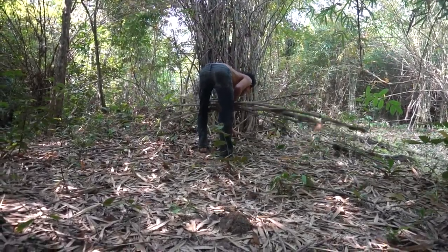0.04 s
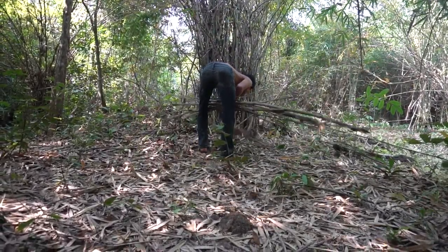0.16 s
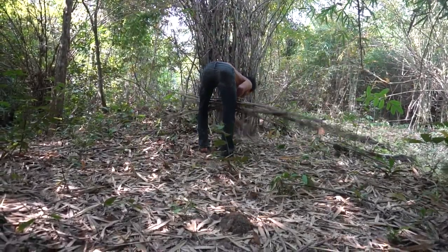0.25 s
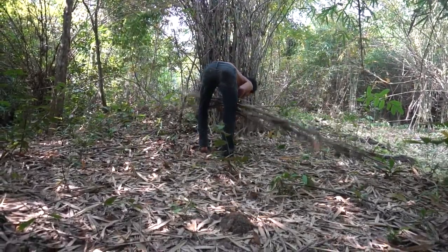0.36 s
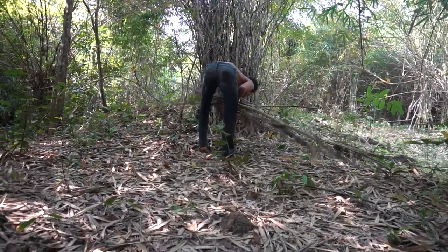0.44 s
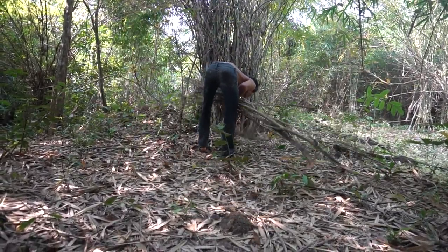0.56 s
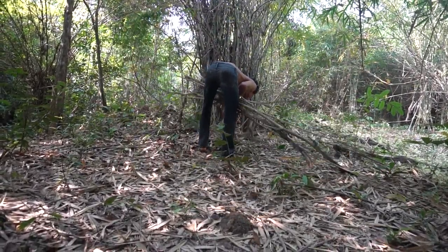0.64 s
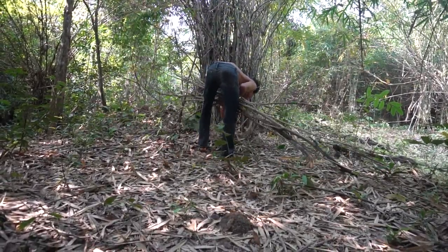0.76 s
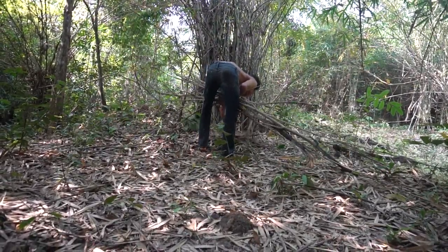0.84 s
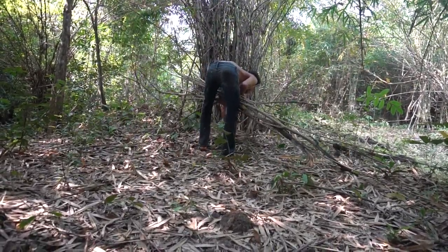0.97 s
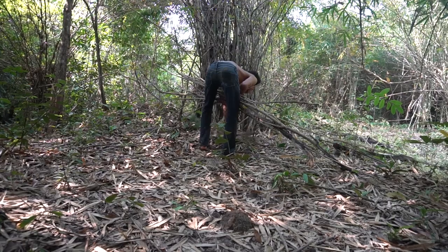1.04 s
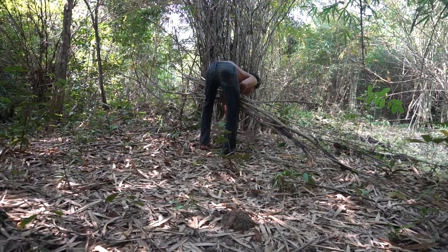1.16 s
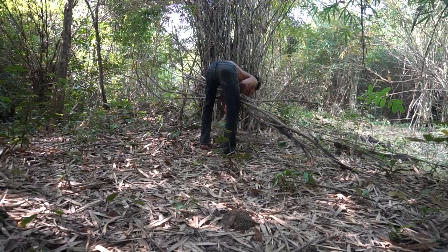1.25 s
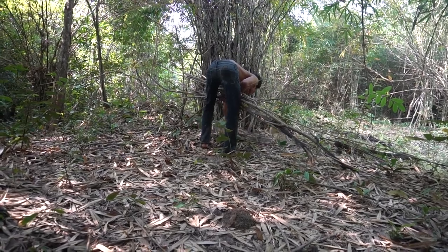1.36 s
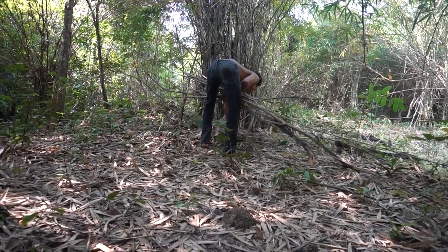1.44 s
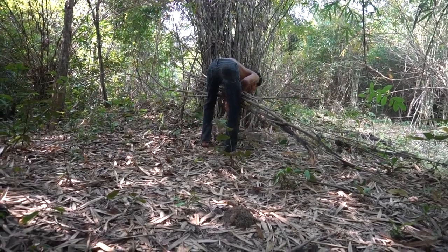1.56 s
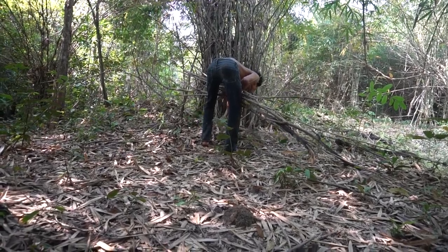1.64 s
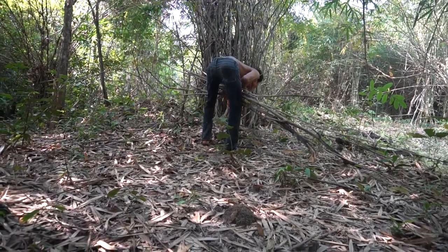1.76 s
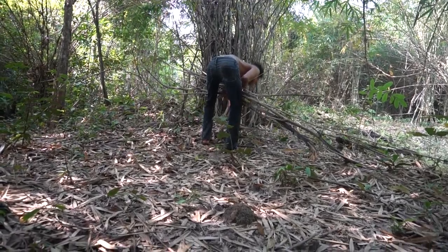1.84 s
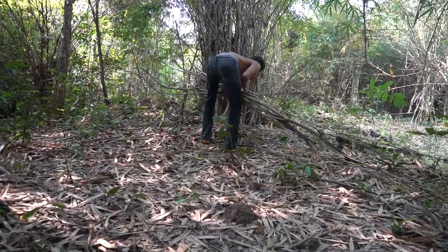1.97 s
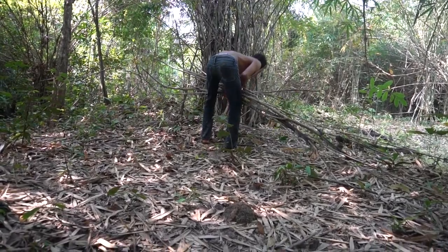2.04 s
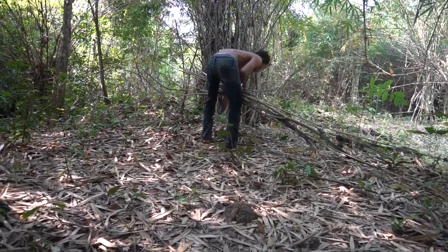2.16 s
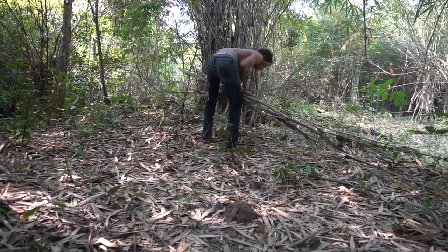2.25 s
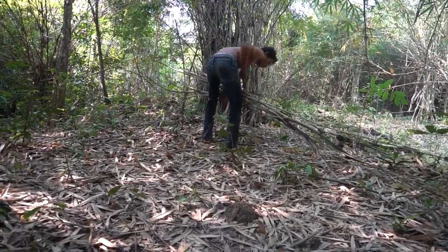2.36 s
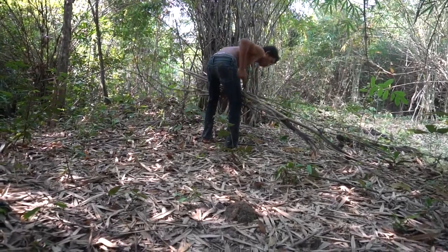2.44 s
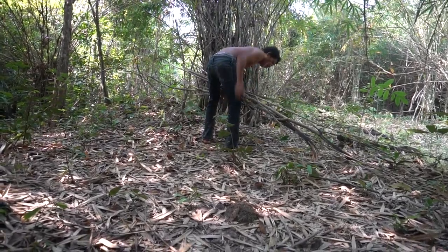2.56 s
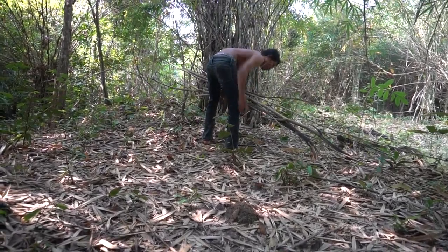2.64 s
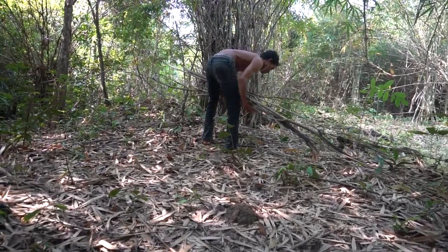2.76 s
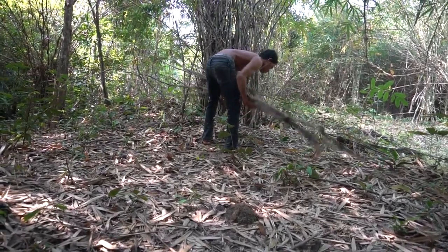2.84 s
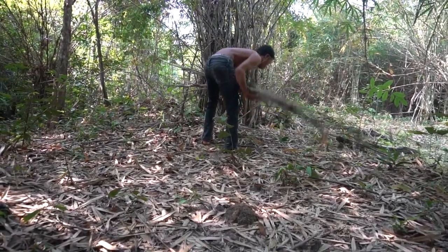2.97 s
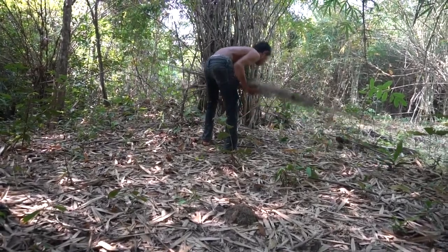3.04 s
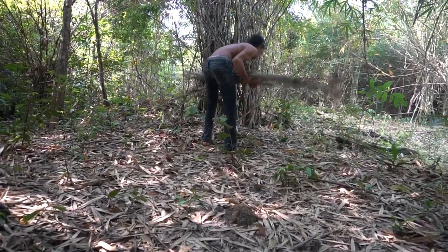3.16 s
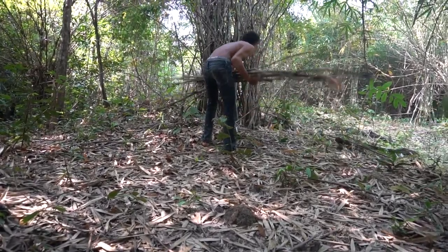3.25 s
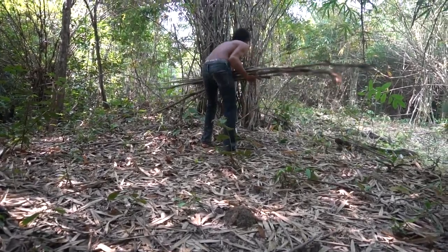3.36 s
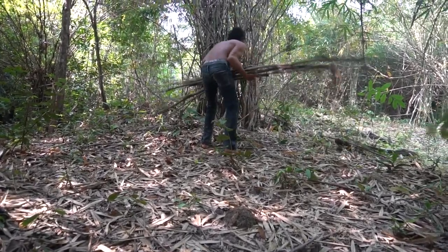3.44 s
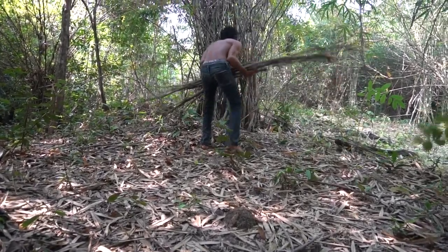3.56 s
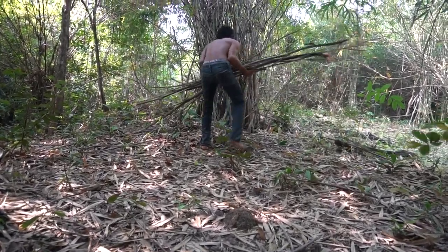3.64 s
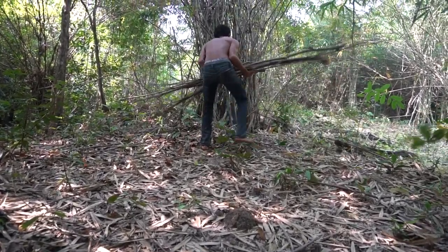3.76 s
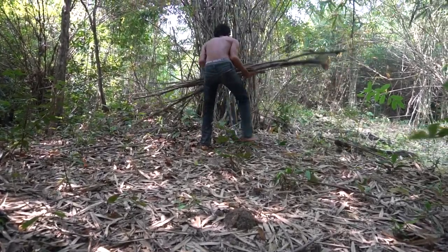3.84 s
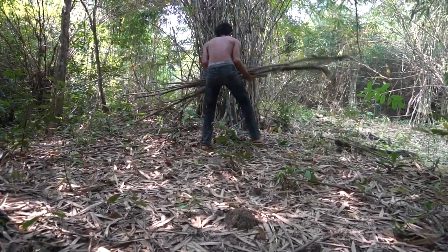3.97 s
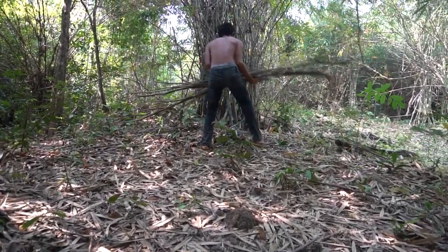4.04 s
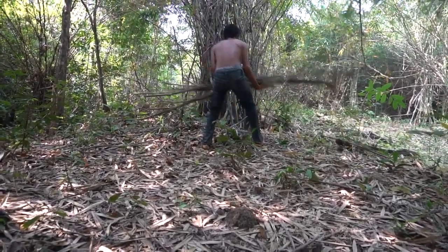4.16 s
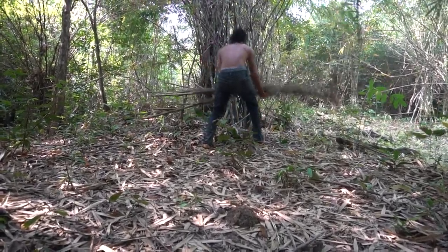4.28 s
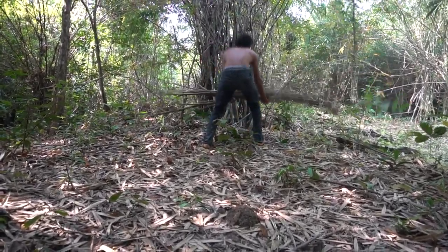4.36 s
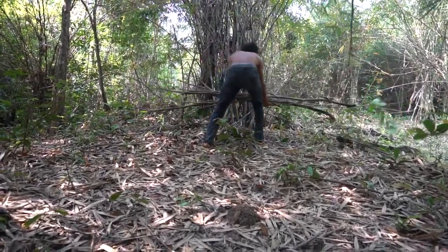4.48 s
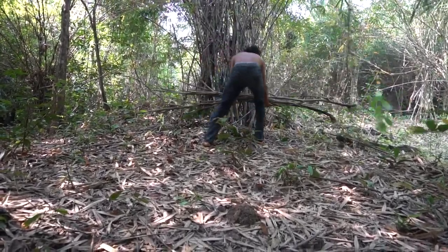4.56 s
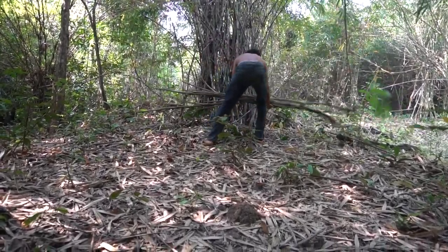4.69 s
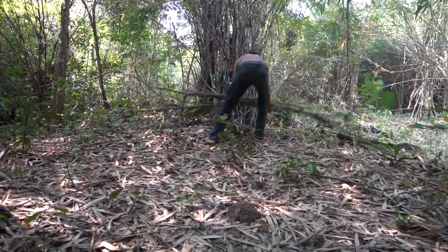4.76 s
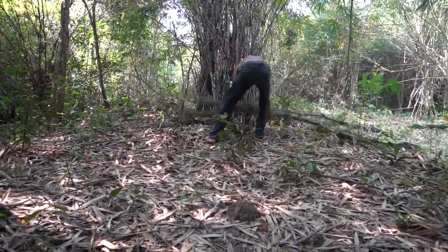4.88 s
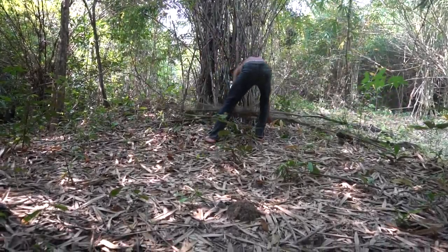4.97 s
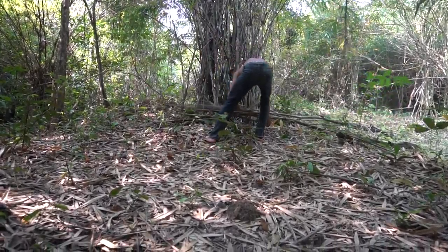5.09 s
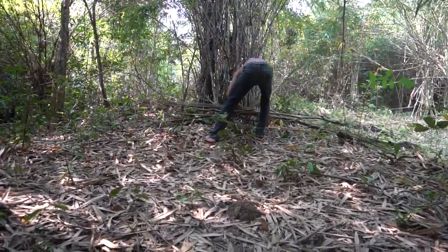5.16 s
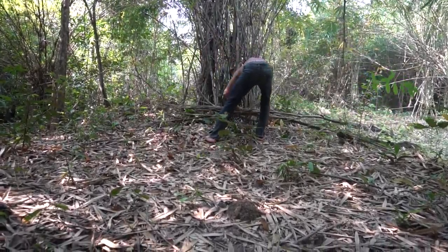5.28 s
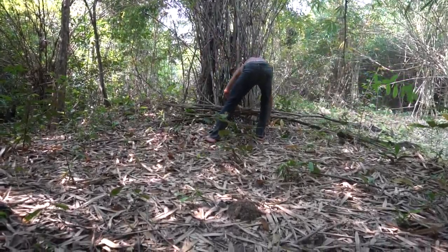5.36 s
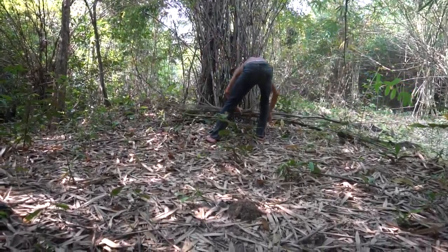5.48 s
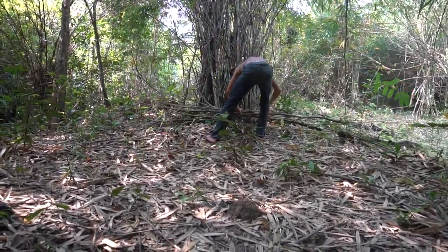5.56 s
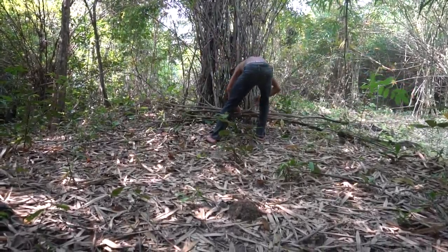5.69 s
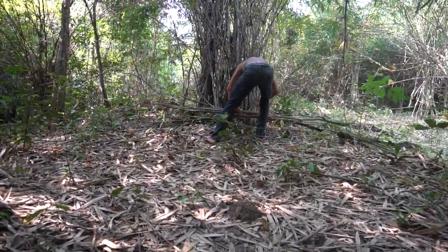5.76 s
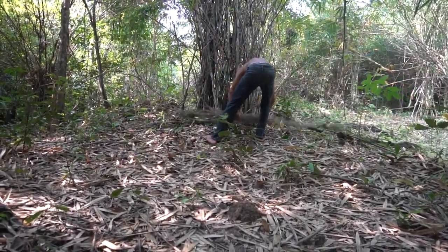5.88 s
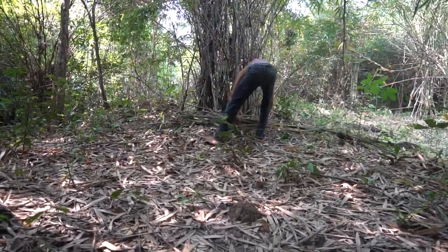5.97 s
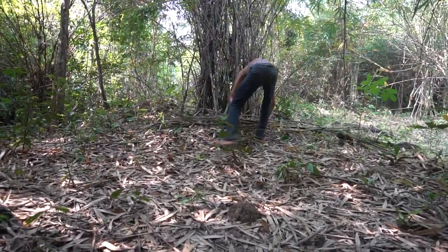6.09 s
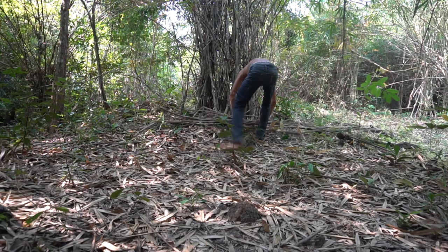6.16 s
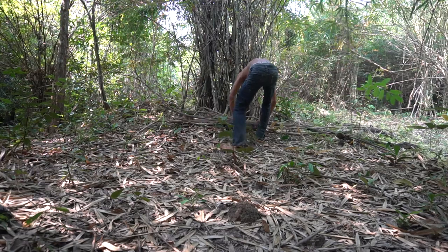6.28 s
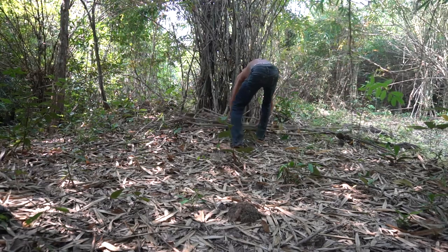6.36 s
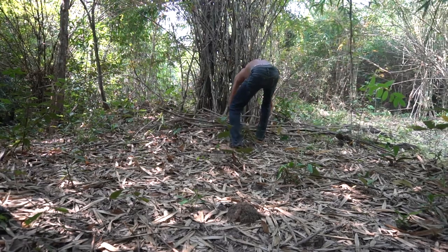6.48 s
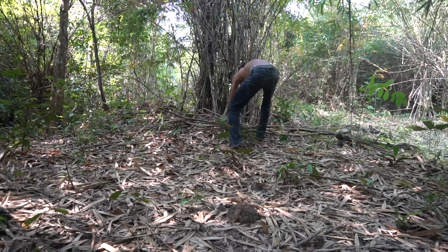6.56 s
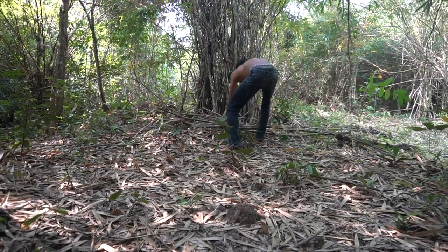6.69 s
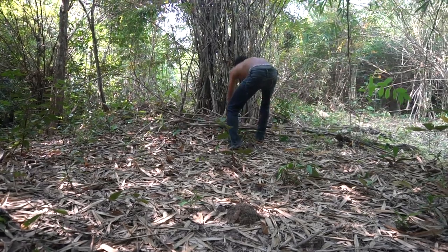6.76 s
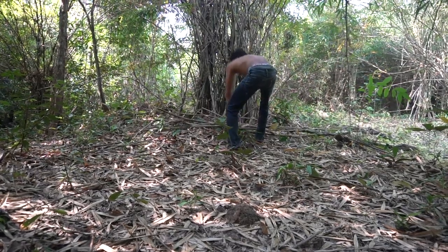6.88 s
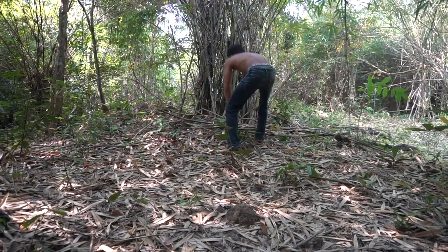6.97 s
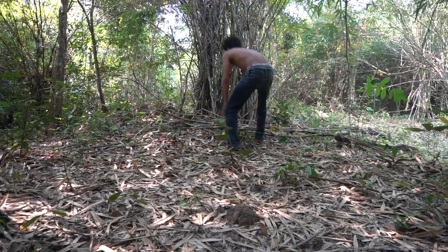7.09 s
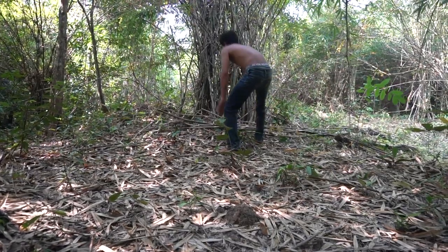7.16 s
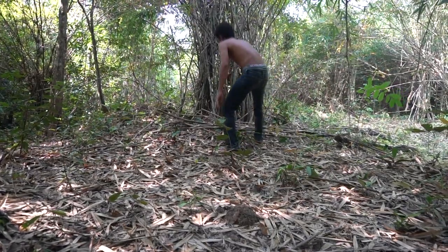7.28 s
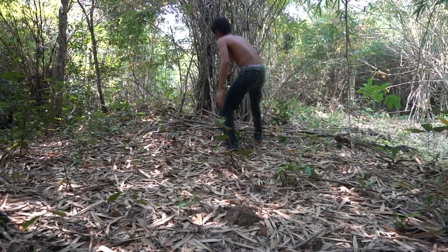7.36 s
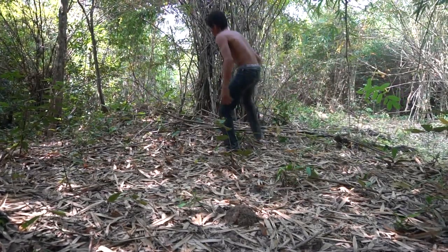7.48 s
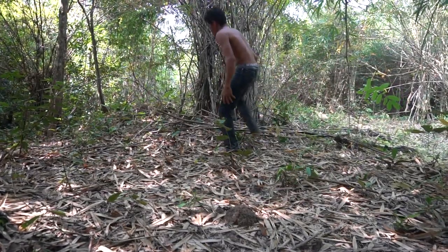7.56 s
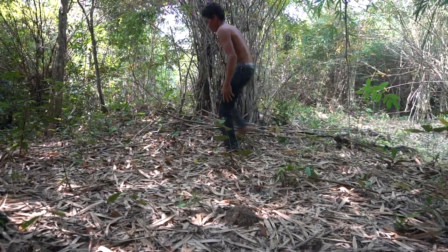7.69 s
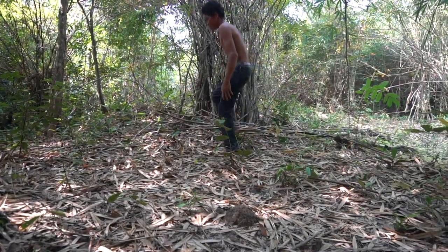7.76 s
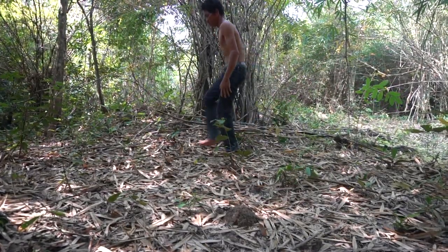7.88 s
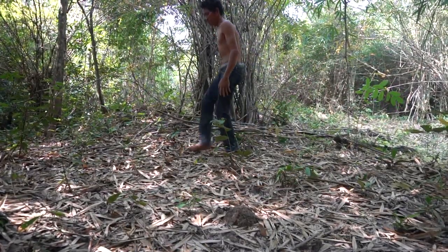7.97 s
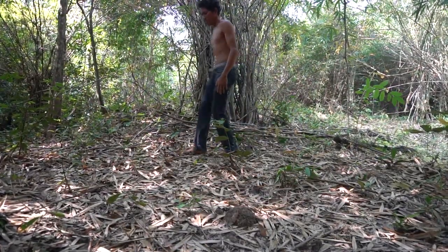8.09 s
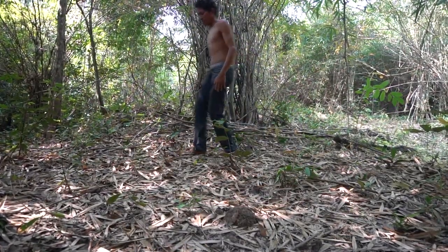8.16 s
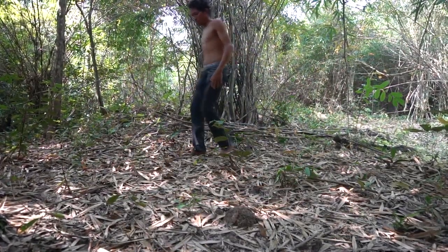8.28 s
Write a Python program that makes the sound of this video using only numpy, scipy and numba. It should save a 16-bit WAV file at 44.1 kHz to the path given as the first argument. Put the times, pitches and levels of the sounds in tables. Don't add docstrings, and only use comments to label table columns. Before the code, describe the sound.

In a quiet wood, a bundle of dry bamboo is dragged over dead leaves: dense crackle and snapping ribs, then a lull of faint rustles. It is lifted and swung with hollow knocks and loud cracks, laid down with crunches, and settles. Stereo microphone some metres away; faint engine drone, a bird whistling twice near the end.

```python
import sys
import numpy as np
from scipy import signal
from scipy.fft import rfft, irfft, next_fast_len
from scipy.io import wavfile
from scipy.ndimage import uniform_filter1d
from numba import njit

SR = 44100
rng = np.random.default_rng(int(sys.argv[2]) if len(sys.argv) > 2 else 0)


def volts_from_db(level):
    exponent = np.asarray(level, float) / 20
    return 10 ** exponent


def inscribe(sig):
    pcm = np.round(np.clip(np.atleast_2d(sig).T, -1, 1) * 32767)
    wavfile.write(sys.argv[1], SR, pcm.astype(np.int16))


N = 367353

# [f/Hz, density/dB]
WOOD_AIR = [(18, -40), (30, -2.5), (131, 4), (311, -8.5), (499, -8), (1010, -15.5), (2830, -21.5),
            (3220, -17.5), (9220, -31), (14800, -43), (16000, -35)]
# [f/Hz, level/dB]
AIR_APART = [(60, -20), (500, 0.5), (2000, 3.0), (6000, -6)]
# [t/s, f/Hz, level/dB]
ENGINE = [
    (0.0, 138.7, -72),
    (0.76, 140.5, -52),
    (2.71, 141, -65.5),
    (4.06, 137.7, -55.5),
    (4.17, 139.9, -63),
    (6.94, 139.7, -49.5),
    (7.52, 138.3, -64),
    (8.33, 139.3, -44.5),
]
# [t/s, f/Hz, level/dB]
ENGINE_UNDERTONE = [
    (.4, 93, -75),
    (.8, 92.8, -64),
    (1.6, 92.8, -65.5),
    (2.6, 92, -66),
    (3.0, 92, -85),
]
# [t/s, f/Hz, level/dB]
DOVE_COO = [
    (8.17, 387, -80),
    (8.21, 384, -60),
    (8.26, 360, -59),
    (8.34, 352, -67),
]
# [t from its drop/s, f/Hz, level/dB]
WHISTLE_SHAPE = [
    (-.2, 3130, -16),
    (-.17, 3190, -8),
    (-.11, 3330, -11),
    (-.075, 3800, -9),
    (-.03, 3960, -4),
    (0, 3640, 0),
    (.045, 3760, -3),
    (.08, 3700, -13),
    (.15, 3670, -19),
]
# [t/s, level/dB, stretch/ratio]
WHISTLE_TIMES = [
    (7.275, -51, 1.08),
    (8.144, -50.5, .92),
]
# [t/s, f/Hz, level/dB]
FARTHER_BIRD = [
    (1.8, 3700, -68),
    (1.9, 3720, -59),
    (2.06, 3700, -64),
]
# [f/Hz, level/dB]
SCATTER_SHAPE = [(150, -9), (1500, -3.5), (4000, 0), (15000, 1.0)]
# [t/s, peak level/dB, f/Hz]
SOIL_THUDS = [
    (0.74, -46, 108),
    (3.268, -44, 125),
    (3.569, -44.5, 84),
]
# [f/Hz, level/dB]
THUD_SHAPE = [(35, -20), (70, 0), (130, 4), (300, -20)]
# [t/s, peak level/dB, ring f/Hz]
HOLLOW_KNOCKS = [(0.745, -42, 595), (1.343, -42.5, 1150), (1.373, -40.5, 820), (2.774, -35.5, 1080),
                 (3.178, -30, 1280), (3.248, -38, 1070), (3.251, -26.5, 1180), (3.263, -25.5, 1150),
                 (3.4455, -27, 1220), (3.563, -26, 698), (3.705, -32, 797), (4.298, -37, 1170),
                 (4.917, -31, 1310), (4.975, -26.5, 194), (5.433, -42, 447), (5.479, -40.5, 358),
                 (6.08, -33, 970), (6.415, -30, 850), (6.427, -32.5, 704), (.253, -37, 520),
                 (.325, -38, 1300), (.632, -36, 900), (.662, -36, 800), (.713, -38.5, 1340),
                 (.93, -43, 620), (1.137, -37.5, 789), (1.203, -36, 910), (2.285, -40, 1140),
                 (2.475, -50, 497), (3.028, -38.5, 1130), (3.14, -38, 1000), (3.35, -31, 1200),
                 (3.478, -30, 895), (3.585, -30, 720), (4.343, -35, 1110), (5.72, -51, 330),
                 (7.584, -50, 1300)]
# [f/Hz, level/dB]
KNOCK_SHAPE = [(40, -27), (150, -1.0), (200, 1)]
# [t/s, f/Hz, level/dB]
SHEATH_SQUEAK = [
    (.22, 9170, -49),
    (.255, 8700, -33),
    (.275, 8670, -30.5),
    (.31, 8900, -50),
]
# [t/s, left minus right level/dB]
BUNDLE_PLACE = [
    (0, 0),
    (2.7, -0.5),
    (2.9, -8),
    (3.25, -13),
    (3.7, -5.5),
    (3.8, -4),
    (4.8, -3.5),
    (5.1, 0),
    (5.5, 0),
    (8.33, 2.5),
]
# [t/s, peak level/dB]
LEAF_TICKS = [(0.192, -23), (0.5287, -20), (0.5781, -16), (0.6005, -21), (0.819, -14), (1.2024, -14.5),
              (1.939, -30), (2.1031, -33), (2.3555, -29), (2.391, -29.5), (2.635, -26.5), (3.03, -21),
              (3.1612, -22), (3.2974, -21), (3.3483, -20), (4.1714, -18), (4.1999, -20), (4.371, -18),
              (4.4545, -15), (4.6867, -30), (4.9731, -14), (5.8064, -26), (5.9519, -16), (6.3669, -25),
              (8.0017, -40), (8.0182, -38), (2.2672, -33), (2.6115, -38), (4.1574, -30), (5.5283, -26.5),
              (7.26, -44), (7.339, -35), (4.3899, -18), (5.2041, -22), (6.3041, -23), (8.0326, -27)]
# [t/s, peak level/dB, ring f/Hz]
RIB_BREAKS = [(.1931, -24, 3800), (.252, -21, 2500), (.3133, -31, 7100), (.529, -20.5, 2120),
              (.7473, -20, 4500), (.821, -18, 6500), (1.3753, -11, 3240), (1.9511, -28, 6630),
              (3.0316, -23.5, 1940), (4.1725, -21.5, 2020), (4.201, -28, 6290), (4.3709, -18, 3120),
              (4.3889, -14, 6600), (4.455, -12.5, 7700), (4.9165, -12.5, 2820), (5.0077, -12, 4030),
              (5.2037, -15.5, 4270), (5.862, -26.5, 2770), (6.0605, -21.5, 2780), (6.0715, -15, 6250),
              (6.082, -8.5, 5170), (6.305, -9.5, 4280), (7.3393, -37, 9000), (.2404, -18, 8800),
              (.618, -14, 6000), (.637, -19, 3000), (.760, -18, 4500), (1.380, -19, 3370),
              (5.078, -26, 8000), (5.9838, -20, 7000), (6.153, -22, 7500), (6.4218, -17, 3200),
              (7.206, -42, 5000), (7.60, -48, 10000), (7.637, -45, 9000), (7.712, -44, 9500)]
# [t/s, peak level/dB, ring f/Hz]
TWIG_SNAPS = [(.777, -15, 3400), (.8778, -6.5, 4900), (2.1037, -30, 3270), (2.1147, -28, 3100),
              (2.4735, -27, 2780), (2.7738, -24, 1910), (3.1179, -30, 2020), (3.178, -20, 3600),
              (3.4726, -14, 6150), (3.6574, -9, 3500), (3.6966, -22, 2450), (4.002, -15, 3120),
              (4.2763, -32.5, 7100), (4.3568, -18, 1900), (4.3847, -12, 3330), (4.4269, -18.5, 2980),
              (4.4908, -19, 3320), (4.5657, -12, 3370), (4.5695, -18, 2640), (4.8649, -18, 5470),
              (5.3015, -16.5, 4800), (5.5292, -25, 3230), (5.934, -19, 4570), (5.9739, -12, 6500),
              (3.279, -19, 3030), (6.6903, -28, 4690), (3.264, -17, 3200), (6.818, -29, 5210),
              (6.9662, -34, 5510), (7.7747, -37, 4320), (8.2927, -40, 4850), (.163, -21, 3580),
              (.580, -22, 4300), (.563, -26, 3600), (2.929, -35, 4100), (3.026, -27, 2600),
              (3.45, -16, 4500), (4.975, -16, 3500), (5.163, -25, 4000), (5.221, -23, 4300),
              (5.255, -26, 4800), (5.421, -29.5, 2700), (6.399, -22, 4900)]
# [t/s, peak level/dB, ring f/Hz]
STALK_CRACKS = [(.232, -18, 2500), (.242, -15, 2550), (.254, -22, 2450), (.336, -20, 2300),
                (.397, -25, 2210), (1.8972, -37.5, 3660), (2.2677, -23.5, 1910), (2.3555, -21.5, 1860),
                (3.2277, -22.5, 3300), (3.252, -20, 1500), (3.4192, -23, 2500), (3.4455, -11, 3120),
                (3.5483, -9, 4700), (3.6048, -5.5, 3300), (3.6196, -9.5, 3470), (3.7631, -1, 5320),
                (3.7650, -8, 4670), (3.8453, -13, 4700), (3.8622, -15.5, 4600), (3.9061, -21.5, 4300),
                (3.971, -20.5, 4530), (4.0508, -20, 4440), (4.3111, -7, 3350), (4.7645, -15.5, 3390),
                (4.9366, -16, 3190), (5.086, -20, 3200), (5.437, -20.5, 2480), (5.4815, -13, 1915),
                (5.485, -16, 2900), (6.392, -22, 2100), (6.4129, -23, 5560), (6.5875, -27, 4170),
                (6.668, -28, 2430), (7.5844, -44, 1740)]
# [f/Hz, level/dB]
SNAP_SHAPE = [(300, -24.0), (1200, -8.0), (2000, 5)]
# [f/Hz, level/dB]
LEAF_SHAPE = [(1200, -28), (2500, -8.5), (4000, -3), (6000, 1.5), (9000, 3), (12000, 2.5), (15500, 0.5),
              (17000, -14)]
TWIG_SHAPE = [(900, -26.5), (1500, -5), (2000, 3), (3200, 3), (4800, 3), (7000, -14.5)]
STALK_SHAPE = [(70, -32), (130, -8), (220, 0), (450, -1), (700, -0.5), (1200, 4.5), (1800, -0.5),
               (2600, -23)]
# [peak t/s, leaves level/dB, rise t/s per 10 dB, fall t/s per 10 dB, wood above leaves level/dB]
HEAP_STIRS = [(0.0, -33.5, .1, -0.03, -5.5), (0.261, -28, 0.14, 0.18, -8.5), (.32, -37, 0.04, .17, -1.5),
              (0.534, -30.5, -0.1, 0.05, -9.5), (0.631, -23, 0.05, .075, -6.5),
              (.75, -27.5, -0.04, .17, -6.5), (1.085, -32, 0.13, 0.37, -7.5),
              (1.205, -29.5, 0.14, -0.0134, -6.5), (1.375, -24.5, -0.0352, 0.1123, -8),
              (1.355, -29.5, 0.12, 0.04, -8), (1.64, -29.5, 0.06, 0.08, -7), (1.8, -47, 1, .4, -4),
              (1.95, -46.5, -0.2, 0.25, -4.5), (2.109, -50, -0.4, 0.8, -4.5),
              (2.272, -37.5, 0.01, 0.17, -3), (2.638, -46.5, 0, 0.3, -10.5), (2.774, -47, 0.13, 0.4, -0.5),
              (2.852, -38.5, 0.04, 0.25, -5.5), (3.033, -34, 0.0165, -0.02, -2.5),
              (3.08, -47, 0.08, -0.3, -7), (.163, -37, .004, 0, -6), (.397, -37, -0.06, .02, -6),
              (.665, -33.5, .02, 0.06, -6.5), (.9, -35, 0.3, 0, -4.5), (2.325, -40, 0.02, 0.06, 0),
              (2.955, -39.5, 0.05, -0.3, -4.5), (3.14, -40, 0.03, 0, 0),
              (3.253, -34, 0.16, 0.21, 2.5), (3.38, -38.5, 0.25, .1, 2.5), (3.49, -30.5, 0.064, 0.013, 5.5),
              (3.551, -27.5, 0.0055, 0.17, -0.5), (3.58, -31, 0.032, .12, 1.5),
              (3.767, -36, 0.012, 0.12, -2), (3.869, -39, 0.16, 0.17, -1),
              (4.007, -38.5, 0.084, 0.77, -3.5), (4.173, -32.5, 0.034, 0.27, -13),
              (4.386, -34, 0.11, 0.44, -3.5), (4.57, -34, .05, 0.088, -2.5), (4.765, -41.5, 0.047, 0.57, 1),
              (4.917, -28.5, 0.023, 0.17, -4), (5.013, -32, 0.037, 0.08, -10), (3.52, -45, .05, .05, -1),
              (3.447, -35, .004, .03, 3), (5.163, -38.5, .004, 0.046, -3),
              (5.214, -38, 0.11, 0.053, -11), (5.303, -33, 0.0065, 0.043, -15), (5.42, -50.5, 0.14, .2, 1),
             (5.535, -37, 0.072, 0.065, -1.5), (5.673, -46.5, .15, .17, -4),
             (5.819, -44.5, 0.029, 0.086, -11), (5.985, -30, 0.085, 0.037, -8.5),
             (6.082, -30, 0.019, 0.092, -9.5), (6.23, -32.5, 0.2, 0.092, -2.5), (6.312, -36, .01, 0.06, -7),
             (6.428, -27, 0.032, 0.033, -3), (6.583, -42.5, .25, 0.031, -1.5),
             (6.733, -44, .16, 0.22, -3.5), (6.994, -34.5, 0.03, 0.028, -8), (7.2, -51, .5, 0.51, -4.5),
             (7.505, -51, 0.05, .05, -5), (8.022, -45.5, 0.014, 0.078, -11), (8.07, -43, 0.044, 0.11, -6),
             (8.25, -57, 0.11, .9, -1.5), (5.955, -32, .006, .02, -10), (6.012, -33, .015, 0.022, -9),
             (8.15, -50, .03, .04, 0)]

LITTER_PAN = 0.39


def level(x, db):
    return x * volts_from_db(db) / np.sqrt(np.mean(x ** 2))


def colour(x, points):
    size = next_fast_len(N)
    hz, db = np.transpose(points)
    shape = np.interp(np.log(np.arange(size // 2 + 1) * SR / size + 1), np.log(hz), db)
    return irfft(rfft(x, size) * volts_from_db(shape), size)[..., :N]


def walk(rate):
    hold = int(SR / rate)
    steps = np.repeat(rng.standard_normal(N // hold + 1), hold)
    return 1.23 * uniform_filter1d(uniform_filter1d(steps, hold), hold)[:N]


def tone(rows, wobble, flutter_db, rate):
    s, hz, db = np.transpose(rows)
    t = np.arange(N) / SR
    pitch = np.interp(t, s, hz) * (1 + wobble * walk(rate))
    gain = volts_from_db(np.interp(t, s, db, -140, -140) + flutter_db * walk(rate))
    return np.sqrt(2) * gain * np.sin(2 * np.pi * np.cumsum(pitch) / SR)


@njit
def rings(s, hz, t60, left, right, lag):
    out = np.zeros((2, N))
    for k in range(len(s)):
        turn = np.exp(2j * np.pi * hz[k] / SR - np.log(1000) / (t60[k] * SR))
        z = 1 + 0j
        i = int(s[k] * SR)
        j = max(i + int(round(lag[k])), 0)
        for n in range(min(int(t60[k] * SR), N - max(i, j))):
            out[0, j + n] += left[k] * z.imag
            out[1, i + n] += right[k] * z.imag
            z *= turn
    return out


def strike(s, hz, t60, db, pan_db, lag):
    return rings(s, np.clip(hz, 40, .45 * SR), t60, volts_from_db(db + pan_db / 2), volts_from_db(db - pan_db / 2), lag)


def place(s):
    return np.interp(s, *np.transpose(BUNDLE_PLACE))


def wood():
    mid, apart = rng.standard_normal((2, N))
    apart = colour(apart, AIR_APART)
    air = colour(mid + apart * np.array([[1], [-1]]), WOOD_AIR)
    return level(air, -55.5) * volts_from_db(0.27 * walk(0.73))


def engine():
    drone = tone(ENGINE, wobble=0.00407, flutter_db=-1.6, rate=9)
    return drone + tone(ENGINE_UNDERTONE, wobble=0.012, flutter_db=-3.0, rate=7.6)


def dove():
    return tone(DOVE_COO, wobble=0.0034, flutter_db=2.5, rate=15)


def birds():
    calls = [FARTHER_BIRD]
    for s, db, stretch in WHISTLE_TIMES:
        calls.append([(s + stretch * d, hz, db + d_db) for d, hz, d_db in WHISTLE_SHAPE])
    return sum(tone(call, wobble=.024, flutter_db=4.5, rate=330) for call in calls) * np.ones((2, 1))


def trunks(x):
    t60_s, onset_s = 0.3, 0.00091
    t = np.arange(int(SR * .5)) / SR
    echo = rng.standard_normal((2, len(t))) * volts_from_db(-60 * t / t60_s) * np.clip(t / onset_s, 0, 1)
    echo = echo / np.sqrt(np.sum(echo ** 2, axis=1, keepdims=True))
    wet = signal.fftconvolve(x.mean(axis=0, keepdims=True), echo, axes=1)[:, :N]
    return colour(wet, SCATTER_SHAPE)


def thuds():
    s, db, hz = np.transpose(SOIL_THUDS)
    return colour(strike(s, hz, 0 * s + 0.09, db + 5.0, 0 * s, 0 * s), THUD_SHAPE)


def knocks():
    s, db, hz = np.transpose(HOLLOW_KNOCKS)
    c = rng.random((len(s), 3, 2))
    out = strike(s, hz, 7 / hz + 0.021, db + 2, 0 * s, 0 * s)
    for k in range(3):
        late = 0.012 * c[:, k, 0]
        near_hz = hz * (0.734 + 0.88 * c[:, k, 1])
        out += strike(s + late, near_hz, 5 / hz + 0.026, db - 6.5, 0 * s, 0 * s)
    return colour(out, KNOCK_SHAPE)


def squeak():
    return tone(SHEATH_SQUEAK, wobble=0.043, flutter_db=6.0, rate=550)


def ticks():
    s, db = np.transpose(LEAF_TICKS)
    c = rng.random((len(s), 3)).T
    hz = 9500 * 1.5 ** c[0]
    pan_db = LITTER_PAN * place(s)
    first = strike(s, hz, 7 / hz, db + 7, pan_db, 0 * s)
    second = strike(s + .003 * c[1], hz * (0.78 + .4 * c[2]), 9 / hz, db + 6, pan_db, 0 * s)
    return first + second


def breaks():
    kinds = (RIB_BREAKS, 6.5), (TWIG_SNAPS, -4), (STALK_CRACKS, -15.5)
    return np.transpose([(*row, treble_db) for rows, treble_db in kinds for row in rows])


def snaps():
    s, db, hz, bright_db = breaks()
    pan_db = place(s)
    lag = -.35 * pan_db
    c = rng.random((len(s), 14, 4))
    ring_db = db - 11 - 0.23 * bright_db
    out = strike(s, hz, 16 / hz + 0.0061, ring_db, pan_db, lag)
    out += strike(s, 1.57 * hz, 4.4 / hz, db - 6.0 + 0.2 * bright_db, pan_db, lag)
    out += strike(s, 0 * s + 11500, 0 * s + 0.00029, db + bright_db + 0.6, pan_db, lag)
    for k in range(14):
        late = .011 * c[:, k, 0] ** 1.8
        fade_db = -800 * late - 6 * c[:, k, 1]
        crack_hz = 6500 * 3.1 ** c[:, k, 2]
        out += strike(s + late, crack_hz, 0 * s + 0.002, db + bright_db - 16.0 + fade_db, pan_db, lag)
        splinter_hz = hz * 2 ** (1.5 * c[:, k, 3] - .35)
        out += strike(s + late, splinter_hz, 9 / splinter_hz, db - 9 + fade_db, pan_db, lag)
    return colour(out, SNAP_SHAPE)


def litter(count, lo_hz, hi_hz, cycles, scatter_db, wide, smooth_db, shape):
    c = rng.random((count, 5)).T
    hz = lo_hz * (hi_hz / lo_hz) ** c[1]
    side = wide * (2 * c[3] - 1)
    size_db = -scatter_db * np.log(c[2] + 0.018)
    grains = strike(c[0] * N / SR, hz, cycles * (.5 + c[4]) / hz, size_db, 6 * side, -4 * side)
    mid, apart = rng.standard_normal((2, N))
    hiss = mid + np.clip(wide, 0, 1) * apart * np.array([[1], [-1]])
    return level(level(colour(grains, shape), 0) + level(colour(hiss, shape), smooth_db), 0)


def slips(rate, fade_s, depth, at_snaps):
    kicks = (rng.random(N) < rate / SR) * np.minimum(rng.exponential(1, N), 1.3)
    kicks[(breaks()[0] * SR).astype(int)] += at_snaps
    settling = signal.lfilter([1], [1, -np.exp(-1 / (fade_s * SR))], kicks)
    return level(1 + depth * settling, 0)


def stirring():
    t = np.arange(0, N + 32, 32) / SR
    s, db, rise_s, fall_s, wood_db = np.transpose(HEAP_STIRS)[:, :, None]
    rising = (s - t) / np.maximum(rise_s, 1e-3)
    falling = (t - s) / np.maximum(fall_s, 1e-3)
    leaf_db = db - 10 * np.where(t < s, rising, falling) ** 1.146
    twig_db = leaf_db + wood_db
    stalk_db = leaf_db + 0.72 * wood_db - 8.5
    gains = [np.sqrt(np.sum(volts_from_db(d) ** 2, axis=0)) for d in (leaf_db, twig_db, stalk_db)]
    return [np.interp(np.arange(N) / SR, t, gain) for gain in gains]


def handling():
    leaf, twig, stalk = stirring()
    pan_db = LITTER_PAN * place(np.arange(N) / SR)
    leaves = litter(count=26000, lo_hz=2500, hi_hz=16600, cycles=4.6, scatter_db=3.0, wide=0.54,
                    smooth_db=-0.5, shape=LEAF_SHAPE)
    twigs = litter(count=6000, lo_hz=1460, hi_hz=5500, cycles=9.0, scatter_db=3.2, wide=0.45,
                   smooth_db=-1, shape=TWIG_SHAPE)
    stalks = litter(count=3500, lo_hz=208, hi_hz=1840, cycles=4.1, scatter_db=2.0, wide=0.16,
                    smooth_db=4.5, shape=STALK_SHAPE)
    crisp = leaves * leaf * volts_from_db(0.93) * slips(rate=160, fade_s=0.0029, depth=0.56, at_snaps=0.78)
    woody = twigs * twig * volts_from_db(-1.0 + 1.4 * walk(50))
    woody = woody + stalks * stalk * volts_from_db(-.5 + 0.45 * walk(25))
    woody = woody * slips(rate=90, fade_s=0.0051, depth=0.5, at_snaps=0.61)
    return (crisp + woody) * volts_from_db(np.array([pan_db, -pan_db]) / 2)


def scene():
    background = wood() + engine() + dove()
    far = birds()
    near = handling() + snaps() + ticks() + knocks() + thuds() + squeak()
    return background + far + volts_from_db(-2.0) * trunks(far) + near + volts_from_db(-8) * trunks(near)


def band_limit(x):
    return signal.sosfilt(signal.butter(12, 16990, fs=SR, output="sos"), x)


def record(dry):
    rounded = .75 * np.tanh(dry / .75)
    top_cut = signal.ellip(10, .2, 70, 15780, fs=SR, output="sos")
    mix = signal.sosfilt(top_cut, rounded)
    return band_limit(mix)


dry = scene()
out = record(dry)
inscribe(out)
```